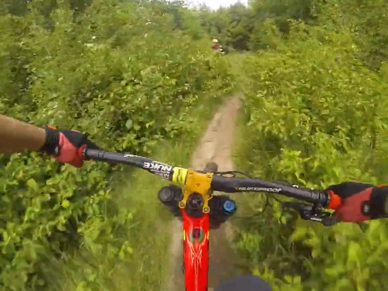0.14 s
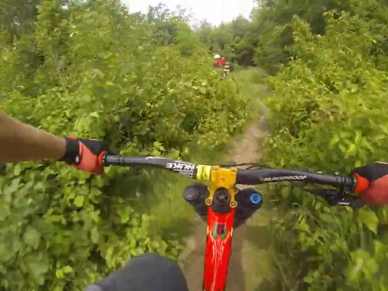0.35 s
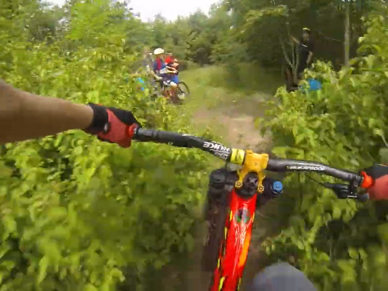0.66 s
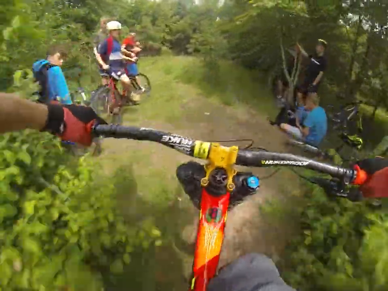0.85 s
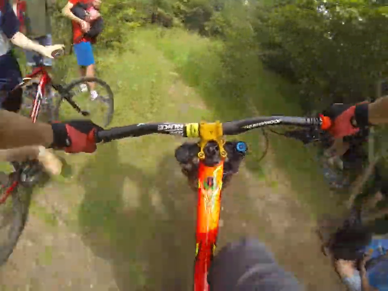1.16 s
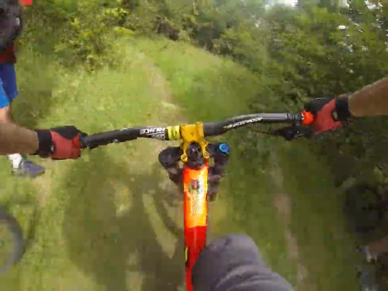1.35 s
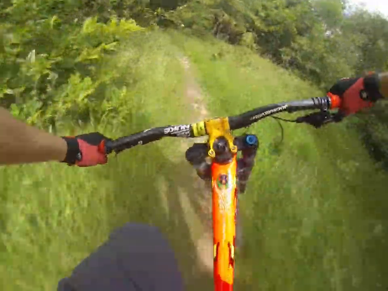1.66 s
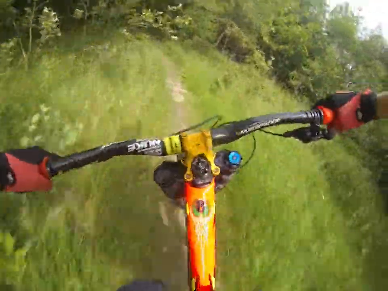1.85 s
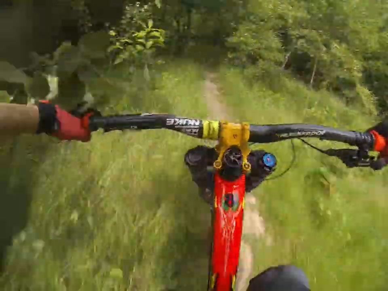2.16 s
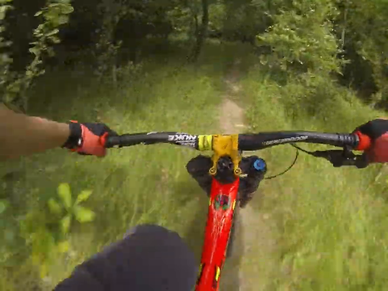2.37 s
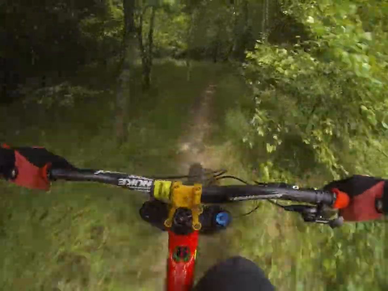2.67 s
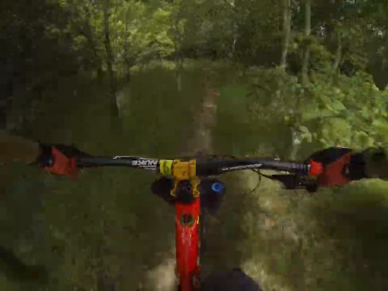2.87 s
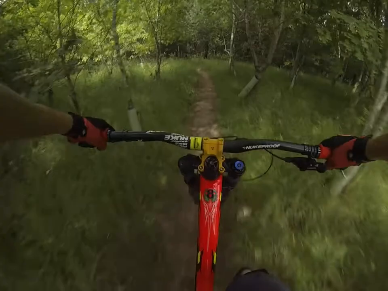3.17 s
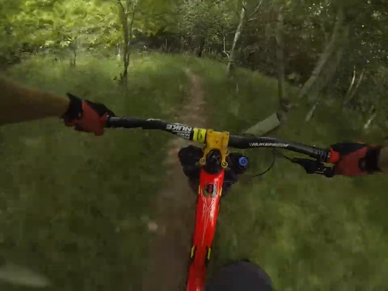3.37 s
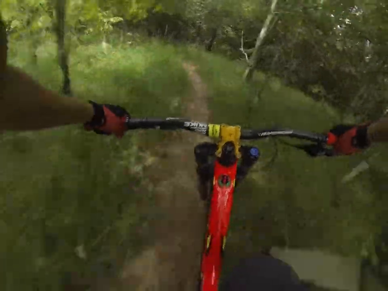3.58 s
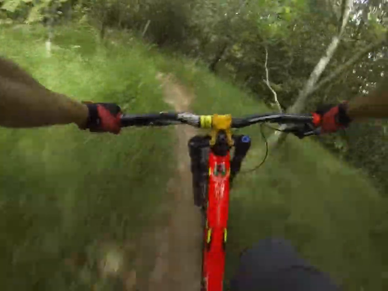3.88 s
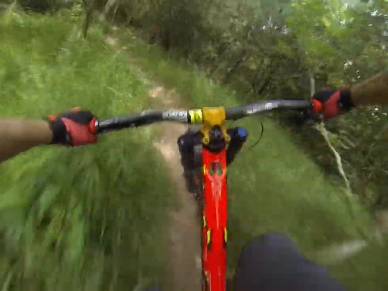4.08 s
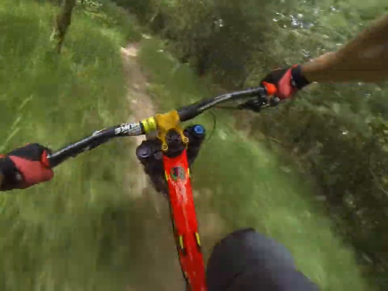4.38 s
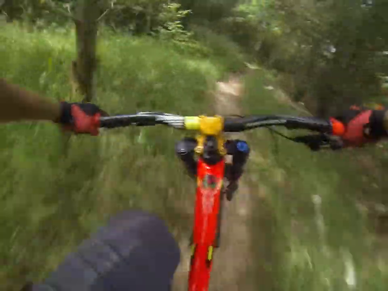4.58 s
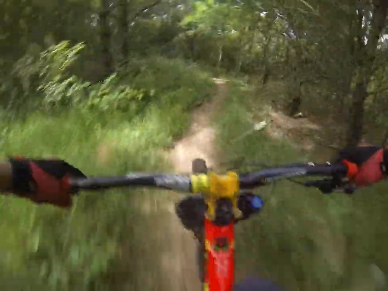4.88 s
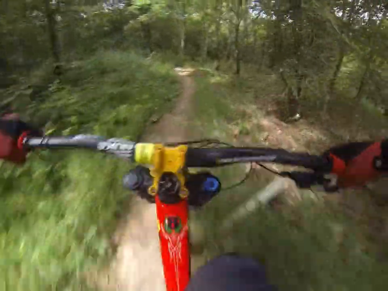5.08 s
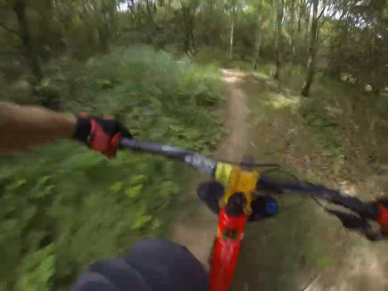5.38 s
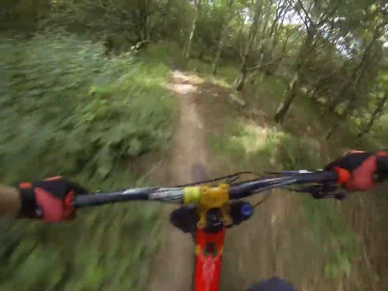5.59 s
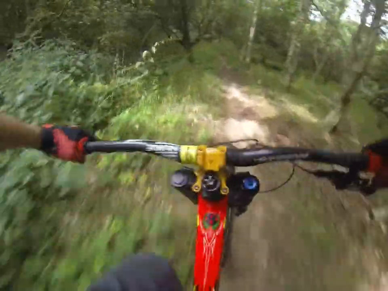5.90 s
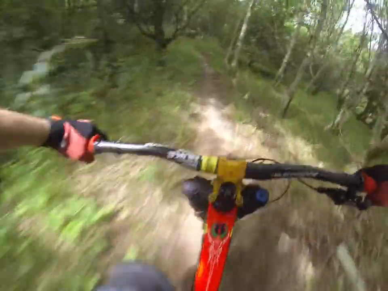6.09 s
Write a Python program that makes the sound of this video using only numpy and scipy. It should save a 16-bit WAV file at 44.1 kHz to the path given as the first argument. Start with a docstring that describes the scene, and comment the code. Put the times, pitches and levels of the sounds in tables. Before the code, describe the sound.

A mountain bike speeds down a narrow dirt trail, heard from a chest-mounted camera in a closed plastic case. Low wind and body shake rumble in gusts beneath constant nasal rattling and chain chatter. Sharp knocks and ticks come at bumps, leaves swish softly, and just after two seconds a hard hit overloads the microphone. The shaking grows strongest past four seconds, then eases.

```python
"""Mountain bike on a dirt trail

A bike runs down a trail, heard by a microphone in a closed plastic camera case on the rider's chest.
Wind and body shake are filtered noise that rumbles below; tyre noise and chain pings grow on rough ground.
Rattle rings the case near 1.6 kHz, and leaves brush past as soft swells of noise.
Ticks and knocks are short rings, cracks and thuds; one hard hit on the case overloads the microphone."""
import sys
import numpy as np
from scipy import signal
from scipy.fft import rfft, irfft, next_fast_len
from scipy.io import wavfile
from scipy.ndimage import uniform_filter1d, map_coordinates

SR = 44100
rng = np.random.default_rng(int(sys.argv[2]) if len(sys.argv) > 2 else 0)


def pcm_store(signal):
    """Save signal as 16-bit PCM."""
    levels = np.round(np.clip(np.atleast_2d(signal), -1, 1) * 32767)
    wavfile.write(sys.argv[1], SR, levels.astype(np.int16).T)


N = 275184

# Roughness of the ground, given as the strength of the rattle it causes.
# Each row: time in seconds, level in dB (before the rattle and chatter take their shares).
ROUGHNESS = [(0, -56.5), (.25, -59.5), (.6, -53.5), (.88, -59), (1.25, -59), (1.58, -52.5), (1.85, -55.5),
             (2.3, -53.5), (2.65, -57), (3, -53), (3.7, -51.5), (3.9, -52.5), (4.3, -48), (4.52, -48.5),
             (4.7, -56.5), (5.3, -58), (5.9, -56.5), (6.24, -58.5)]


def amp(db):
    """Turn decibels into a gain."""
    return 10 ** (np.asarray(db) / 20)


def unit(x):
    """Scale a sound to an average (rms) level of 1."""
    return x / np.sqrt(np.mean(x ** 2) + 1e-20)


def wobble(rate):
    """A smooth random curve through a given number of random points a second."""
    points = rng.standard_normal(int(N * rate / SR) + 4)
    return map_coordinates(points, [np.arange(N) * rate / SR])


def swells(rows):
    """A gain that rises and falls once for each row of middle (s), length (s) and peak level (dB)."""
    t = np.arange(N) / SR
    return sum(amp(db) * np.exp(-(2 * (t - s) / length) ** 2) for s, length, db in rows)


def filtered(x, response):
    """Multiply the spectrum of a sound by a response that depends on frequency."""
    size = 2 * next_fast_len(len(x))
    spectrum = rfft(x, size) * response(np.fft.rfftfreq(size, 1 / SR))
    return irfft(spectrum, size)[:len(x)]


def colour(x, points):
    """Shape the tone by (Hz, dB) points with a filter that never sounds ahead of its input."""
    def response(hz):
        f, db = np.transpose(points)
        gain = amp(np.interp(np.log(hz + 1), np.log(f + 1), db))
        cepstrum = irfft(np.log(gain))
        half = len(cepstrum) // 2
        # folding the cepstrum forward in time gives the phase that belongs to this gain
        folded = np.r_[cepstrum[0], 2 * cepstrum[1:half], np.zeros(half)]
        return np.exp(rfft(folded))
    return filtered(x, response)


def resonance(x, hz, width_hz):
    """One resonance of the case passes a narrow band around its pitch."""
    return filtered(x, lambda f: 1j * f * width_hz / (hz * hz - f * f + 1j * f * width_hz))


def case(x, flutter_db):
    """The case walls ring; as the point of contact moves, each resonance takes a changing share."""
    # Resonances of the camera case. Each row: pitch in Hz, width in Hz, gain in dB.
    case_rings = [(1425, 307, -4.5), (1650, 144, 2), (2330, 330, -13), (3130, 220, -16.5), (5370, 240, -19),
                  (8250, 300, -28)]
    total = np.zeros(N)
    for k, (hz, width_hz, db) in enumerate(case_rings):
        share = x * amp(flutter_db * wobble(70))
        total += (-1) ** k * amp(db) * resonance(share, hz, width_hz)  # alternating signs
    return total


def grains(rate, spread_db):
    """Random tiny impacts, rate a second, of uneven size with the largest held back."""
    hits = rng.random(N) < rate / SR
    signs = rng.choice([-1, 1], N)
    sizes = amp(spread_db * np.minimum(rng.standard_normal(N), 2))
    return unit(hits * signs * sizes)


def ping(hz, rise):
    """A tone that swells for rise seconds and dies away."""
    t = np.arange(SR // 12) / SR
    return np.sin(2 * np.pi * hz * t) * (t / rise * np.exp(1 - t / rise)) ** 2


def add(track, s, sound):
    """Mix a sound into the track at time s."""
    part = track[round(s * SR):][:len(sound)]
    part += sound[:len(part)]


def contact(ring_db, crack_db, thud_db, ring_hz, rise, crack_t60, thud_t60, dull_db):
    """One impact: the case swells into a short ring, over a crack of its own colour and a dull push."""
    # Tone of the crack. Each row: frequency in Hz, level in dB (each impact varies it).
    crack_colour = [(900, -27), (2000, -1), (3100, 5.5), (4200, -9), (5900, -13), (6600, -10),
                    (7400, -17.5), (12000, -23.5), (15000, -42)]
    # Tone of the dull push. Each row: frequency in Hz, level in dB.
    thud_colour = [(40, -4.5), (130, 3.5), (620, -2), (1200, -3), (2500, -43.5), (9000, -78.5)]
    t = np.arange(SR // 12) / SR

    def burst(t60):
        return rng.standard_normal(len(t)) * amp(-60 * t / t60)  # falls 60 dB in t60 seconds

    def sized(x):
        return x * np.sqrt(SR / 100 / np.sum(x ** 2))  # as much energy as 10 ms at rms 1

    crack_points = []
    for hz, db in crack_colour:
        treble_share = np.interp(hz, [4000, 10000], [0, 1])
        crack_points.append((hz, db - dull_db * treble_share + 3 * rng.standard_normal()))
    crack = colour(burst(crack_t60), crack_points)
    thud = colour(12 * (t == 0) + burst(thud_t60), thud_colour)  # one push, then a shudder
    return amp(ring_db) * ping(ring_hz, rise) + amp(crack_db) * sized(crack) + amp(thud_db) * sized(thud)


def wind():
    """Slow pressure swings as air and the rider's body shake the case, in gusts with lulls between."""
    # Tone of the rumble. Each row: frequency in Hz, level in dB.
    rumble_colour = [(4, -21), (13, 1.5), (27, -2), (40, -16.5), (60, -23.5), (100, -37.5), (200, -56),
                     (500, -95.5)]
    # Gusts and body shake. Each row: middle in seconds, length in seconds, level in dB.
    gusts = [(.05, 0.12, -41), (.27, 0.09, -34), (.47, 0.14, -26.5), (.75, 0.14, -32), (.9, 0.11, -32),
             (1.29, 0.045, -36), (1.62, 0.32, -31.5), (1.87, 0.26, -28), (2.37, 0.31, -30.5),
             (2.67, 0.23, -41.5), (2.98, 0.078, -35.5), (3.29, 0.46, -37), (3.76, 0.19, -29),
             (4.02, 0.19, -25.5), (4.34, 0.38, -24), (4.7, 0.37, -39), (5.11, 0.13, -33.5),
             (5.36, 0.13, -38), (6.05, 0.82, -39.5)]
    lull_db = -38.5  # the buffeting that is always there
    surge_db, surge_rate = 1.5, 11  # typical random surge in level, random points a second
    swing = colour(rng.standard_normal(N), rumble_colour)
    # even out the strength, judged by the part above about 20 Hz
    audible = filtered(swing, lambda hz: 1 - 1 / (1 + (hz / 20) ** 8))
    power = uniform_filter1d(uniform_filter1d(audible ** 2, size=SR // 8), size=SR // 20)
    steady = swing / np.sqrt(np.abs(power))
    return (amp(lull_db) + swells(gusts)) * amp(surge_db * wobble(surge_rate)) * steady


def trail():
    """Tyres roar and throw grit, stones patter and the chain chatters; all grow on rough ground."""
    # Tones of the tyre roar, the boom in a hollow, and the gritty hiss of the tyres.
    # Each row: frequency in Hz, level in dB.
    roar_colour = [(50, -14), (110, -3), (350, -14.5), (700, -21.5), (1100, -29), (9000, -88.5)]
    thump_colour = [(50, -12), (110, 8.5), (170, -8.5), (400, -22.5), (2000, -96)]
    grit_colour = [(1800, -2.5), (3300, 0.5), (4850, -4), (5400, -1.5), (5900, -7), (8300, -8.5),
                   (12300, -17), (13500, -36)]
    # What the case wall passes of the rattle. Each row: frequency in Hz, gain in dB.
    wall = [(300, -27.5), (1000, -5), (1500, 0.5), (2150, -2), (3300, 2), (4200, -3), (14000, -24.5)]
    # Tyres bottoming in hollows. Each row: middle in seconds, length in seconds, level in dB.
    hollows = [(0.437, 0.1, -57), (2.4, 0.045, -53), (2.98, 0.046, -42), (3.635, 0.11, -38.5)]
    # Rings that a chain ping can raise, in Hz.
    chatter_rings = [1430, 1560, 1650]
    roar_db, roar_grows = -57.5, 0.4  # level on average ground; its dB for each dB of roughness
    grit_db, grit_grows = -70, 0.17  # the same for the hiss of the grit
    chatter_db, chatter_rate = -6.5, 57  # share of the roughness level; pings a second

    rattle_db = np.interp(np.arange(N) / SR, *np.transpose(ROUGHNESS))
    rough_db = rattle_db - rattle_db.mean()
    jolts = wobble(35)  # the uneven ground shakes everything together

    roar = unit(colour(rng.standard_normal(N) * amp(2 * jolts), roar_colour))
    thumps = swells(hollows) * unit(colour(rng.standard_normal(N), thump_colour))

    patter = (grains(rate=260, spread_db=3.0) + 0.75 * rng.standard_normal(N)) * amp(2.395 * jolts)
    rattle = amp(-1.5) * unit(colour(case(patter, flutter_db=2.0), wall))

    chatter = np.zeros(N)
    for hz in chatter_rings:
        links = grains(chatter_rate / len(chatter_rings), spread_db=2.5)
        chatter += signal.fftconvolve(links, ping(hz, rise=.002))[:N]
    chatter = unit(chatter)

    crunch = grains(rate=700, spread_db=1.0) + rng.standard_normal(N)
    grit = unit(colour(crunch * amp(jolts + 1.2 * wobble(130)), grit_colour))

    tyres = amp(roar_db + roar_grows * rough_db) * roar + thumps
    hiss = amp(grit_db + grit_grows * rough_db) * grit
    return tyres + hiss + amp(rattle_db) * (rattle + amp(chatter_db) * chatter)


def leaves():
    """Each swish is a soft rush of leaves with a few stalks flicking out of it."""
    # Tone of the leaves. Each row: frequency in Hz, level in dB.
    leaf_colour = [(1000, -24.5), (2500, -1.5), (3300, -2), (4200, -8.5), (5400, -2), (5950, -10),
                   (8200, -12), (10000, -19), (14000, -20), (15000, -33.5)]
    # Leaves and twigs sweeping or flicking along the rider.
    # Each row: middle in seconds, length in seconds, level in dB.
    swishes = [(.43, 0.27, -67), (.64, 0.17, -60), (.742, 0.031, -59), (1.528, 0.027, -58.5),
               (2.1, 0.042, -52.5), (2.228, 0.028, -55), (2.78, 0.024, -58.5), (2.83, 0.06, -65),
               (3.598, 0.0036, -37)]
    rustle = (.5 * grains(rate=130, spread_db=3.5) + rng.standard_normal(N)) * amp(1.5 * wobble(55))
    return swells(swishes) * unit(colour(rustle, leaf_colour))


def taps():
    """The chain taps faintly at random, harder on rough ground; makes rows like those of the ticks."""
    rate, spread_db = 10, 4.5  # taps a second; largest random change of level either way
    above_ground_db = (8, -9)  # case ring and crack, each against the roughness level
    slots = np.arange(int(rate * N / SR))
    chance = rng.random((len(slots), 3))
    times = (slots + chance[:, 0]) / rate  # one tap somewhere in each slot
    ground_db = np.interp(times, *np.transpose(ROUGHNESS))
    levels = ground_db[:, None] + above_ground_db + spread_db * (2 * chance[:, 1:] - 1)
    return np.c_[times, levels]


def ticks():
    """Chain links and small stones tick lightly, with a small scrape; each rings at its own pitch."""
    # Light ticks of chain and flung stones.
    # Each row: start in seconds, case ring peak in dB, crack level in dB.
    tick_rows = [(.1176, -48, -60.5), (.2843, -56, -56.5), (.6983, -42.5, -57), (1.2565, -38, -58),
                 (1.489, -37.5, -65), (2.2049, -51, -52), (2.438, -53, -61), (2.3496, -38.5, -60),
                 (2.8135, -40, -54.5), (3.027, -49, -56), (3.2244, -49, -58), (3.2525, -38.5, -53.5),
                 (3.9809, -38, -69), (4.0407, -37, -56), (4.2358, -43, -68), (4.264, -39, -66),
                 (4.2847, -35, -64), (4.3115, -35, -54), (4.3355, -35, -65), (4.357, -47, -56.5),
                 (4.4485, -34, -54), (4.6658, -44, -60), (4.953, -39, -56.5), (5.1244, -41.5, -56.5),
                 (5.1696, -44.5, -56), (5.2845, -35.5, -61.5), (5.5544, -53, -58.5), (5.821, -44, -56.5),
                 (5.9035, -37.5, -58), (5.9663, -49, -58)]
    middle_hz, scatter_hz = 1536, 72  # the ring of a tick, and how much it typically varies
    track = np.zeros(N)
    for s, ring_db, crack_db in [*tick_rows, *taps()]:
        ring_hz = middle_hz + scatter_hz * rng.standard_normal()
        add(track, s, contact(ring_db, crack_db, -68, ring_hz, rise=0.0022,
                              crack_t60=0.044, thud_t60=0.034, dull_db=2.5))
    return track


def knocks():
    """Chain and frame knock at bumps: hard knocks are abrupt, light ones scuff, heavy ones are duller."""
    # Knocks over bumps. Each row: start in seconds, then case ring peak, crack and thud in dB
    # (all three before the trims below), ring pitch in Hz.
    knock_rows = [(0.2247, -34.5, -63, -57.5, 1440), (0.3266, -26, -46, -73, 1500),
                  (0.396, -27.5, -48.5, -52, 1560), (.4648, -29, -40, -45.5, 1480),
                  (0.7386, -32.5, -53.5, -70, 1447), (.841, -37, -60.5, -61, 1425),
                  (0.961, -36, -59, -59, 1430), (1.1787, -31.5, -50.5, -78, 1455),
                  (1.281, -30.5, -55, -45.5, 1540), (1.306, -33.5, -63, -65, 1514),
                  (1.4362, -32, -54, -69, 1495), (1.549, -33, -53, -71, 1560),
                  (1.5717, -27, -52.5, -40.5, 1560), (1.632, -21, -37.5, -39.5, 1520),
                  (1.8007, -27.5, -43.5, -50.5, 1595), (2.2978, -32, -56, -68, 1600),
                  (2.8942, -31, -54, -73, 1500), (2.9628, -30.5, -56, -47.5, 1710),
                  (3.283, -30.5, -55.5, -75, 1580), (3.5312, -31, -58, -56, 1530),
                  (3.5934, -25, -39.5, -57, 1750), (3.5966, -23.5, -43, -40.5, 1730),
                  (3.7183, -24.5, -48.5, -56, 1515), (4.0587, -32, -51, -42.5, 1550),
                  (4.1655, -23.5, -44.5, -54, 1626), (4.258, -33, -59, -47, 1620),
                  (4.3038, -29, -57, -56, 1590), (4.3925, -30, -48.5, -48.5, 1560),
                  (4.4314, -27.5, -59, -71, 1560), (4.4931, -27.5, -54.5, -50.5, 1540),
                  (4.78, -34.5, -53.5, -54.5, 1560), (5.2725, -35, -55.5, -59, 1460),
                  (5.47, -36.5, -56, -57, 1575), (5.6485, -26.5, -46, -42.5, 1520),
                  (5.789, -31.5, -49.5, -67, 1470), (5.845, -34.5, -59, -76, 1460)]
    heavy_dull_db = 11  # treble that the heaviest knocks lack
    track = np.zeros(N)
    for s, ring_db, crack_db, thud_db, ring_hz in knock_rows:
        softness = np.interp(max(crack_db, thud_db), [-58, -42], [2, 1])
        weight = np.interp(thud_db - crack_db, [-8, 2], [0, 1])
        add(track, s, contact(ring_db - 3.0, crack_db - 0.5, thud_db - 3.5, ring_hz,
                              rise=0.0016 * softness, crack_t60=0.022 * softness,
                              thud_t60=0.052, dull_db=heavy_dull_db * weight))
    return track


def blow():
    """A hard hit on the case chatters, rocks the camera, rings the mount and leaves a thin steel ring."""
    # Quick contacts that make up the blow.
    # Each row: start in seconds, case ring peak in dB, crack level in dB, thud level in dB.
    hits = [(2.1202, -12, -28.5, -26.5), (2.1215, 7.5, -22, -19.5), (2.1253, -12.5, -22, -30.5),
            (2.1335, -18, -36.5, -34), (2.1416, -18.5, -42.5, -41.5)]
    # Short rings of the case and its mount, and the longer ring of a small steel part.
    # Each row: pitch in Hz, starting level in dB, time to fall by 60 dB in seconds.
    mount_rings = [(300, -19.5, 0.025), (409, -20.5, .028), (516, -22.5, 0.021), (748, -23, 0.069),
                   (950, -21.5, 0.025), (1443, -24, .04), (1970, -39, .14), (2460, -26, .028)]
    steel_rings = [(4021, -68, .7), (4436, -56, .8), (5916, -63, .62)]
    track, t = np.zeros(N), np.arange(SR // 2) / SR
    for s, ring_db, crack_db, thud_db in hits:
        add(track, s, contact(ring_db, crack_db, thud_db, ring_hz=1620, rise=0.0015,
                              crack_t60=0.022, thud_t60=0.031, dull_db=-7.5))  # extra treble
    hardest_s = hits[1][0]
    for hz, db, t60 in [*mount_rings, *steel_rings]:
        add(track, hardest_s, amp(db - 60 * t / t60) * np.sin(2 * np.pi * hz * t))
    add(track, hardest_s, amp(-16.5) * ping(45, rise=.013))  # the camera rocks
    return track


def scene():
    """Everything reaches one microphone inside the case."""
    return (wind() + trail() + leaves() + knocks() + ticks() + blow())[None]


def record(dry):
    """The microphone saturates at full scale, an overload ducks the gain briefly, and the top is cut."""
    duck_db, duck_s = -3, 0.04  # deepest dip for one overload; time to the deepest point
    top_hz = 15100  # nearly nothing is kept above this
    clipped = dry[0] / (1 + np.abs(dry[0]) ** 6) ** (1 / 6)
    overload = np.maximum(np.abs(dry[0]) - 1, 0)
    age = np.arange(SR // 2) / SR / duck_s
    dip = (age * np.exp(1 - age)) ** 3
    duck = signal.fftconvolve(overload / (overload.sum() + 1), dip)[:N]
    return filtered(clipped * amp(duck_db * duck), lambda hz: 1 / (1 + (hz / top_hz) ** 120))[None]


dry = scene()
out = record(dry)
pcm_store(out)
```